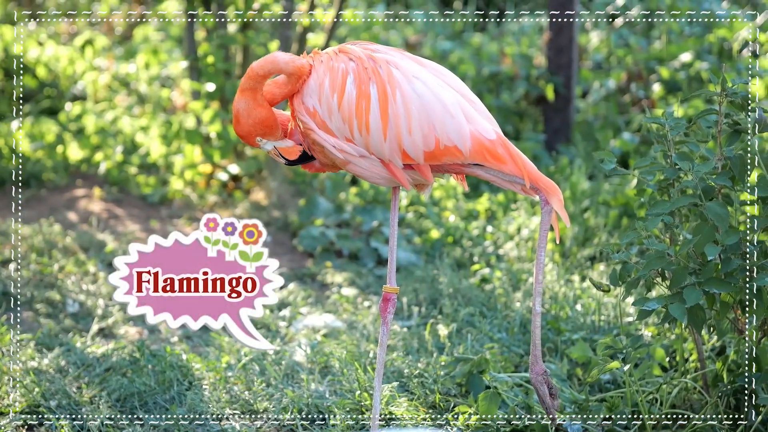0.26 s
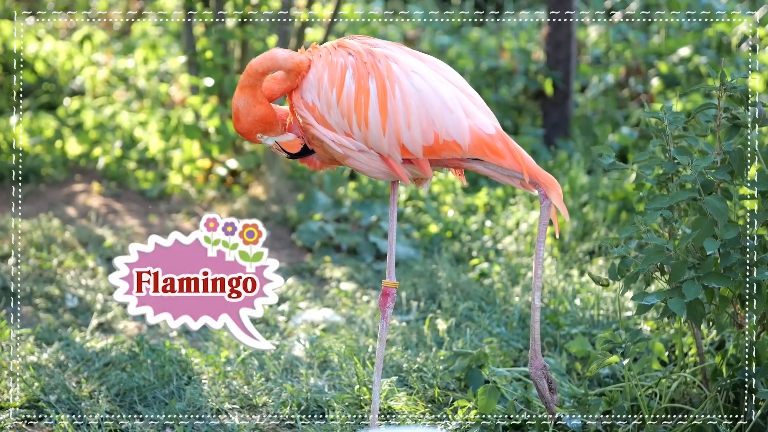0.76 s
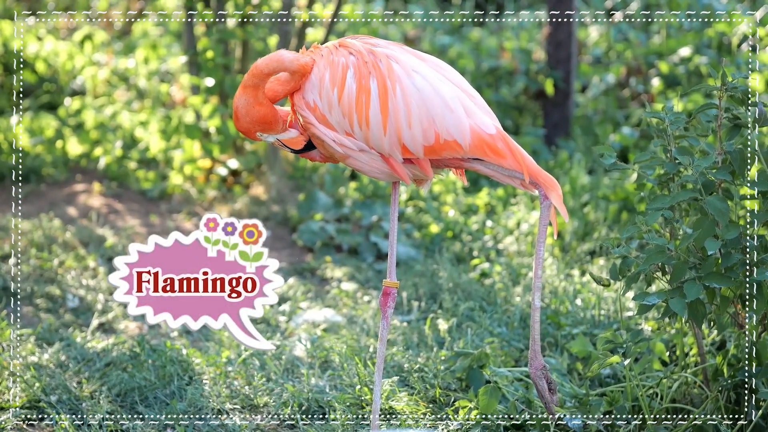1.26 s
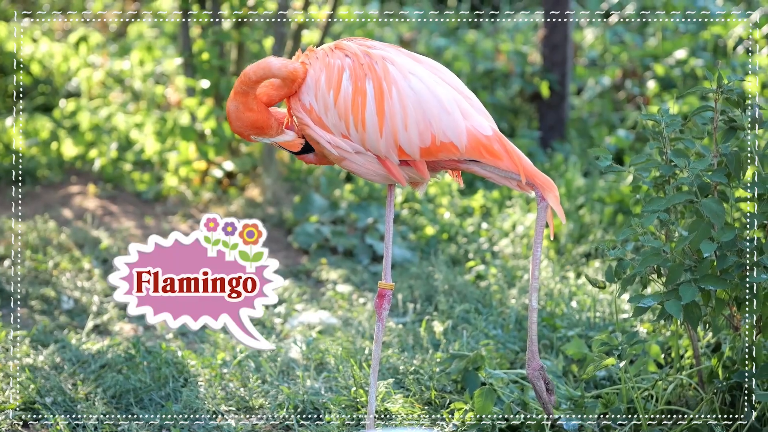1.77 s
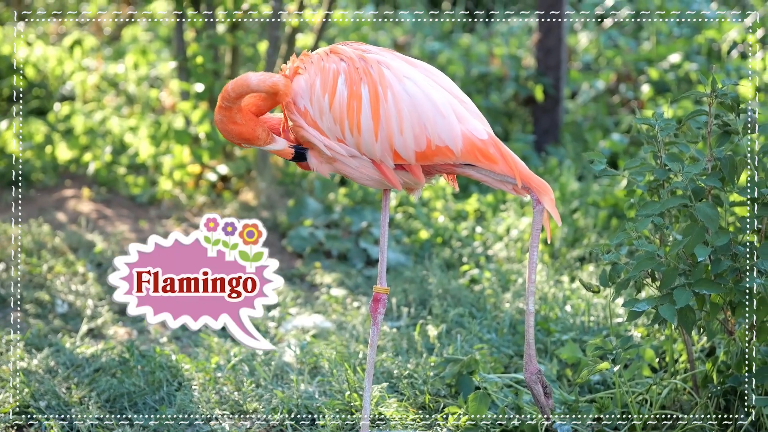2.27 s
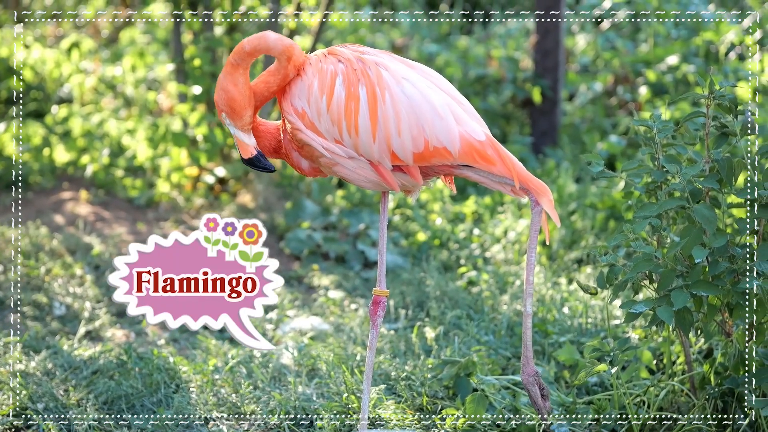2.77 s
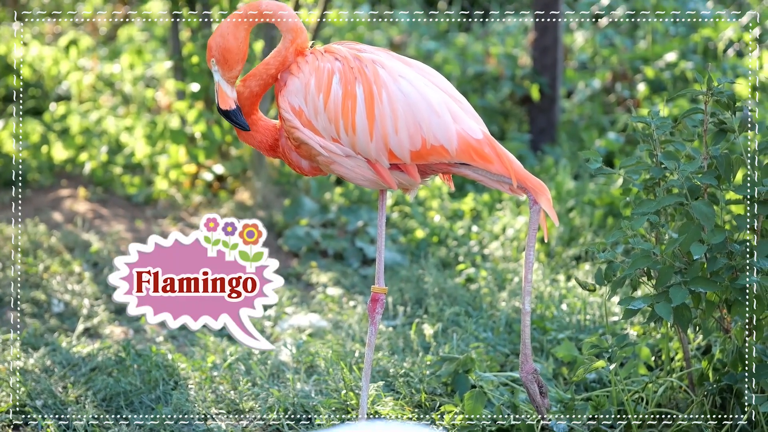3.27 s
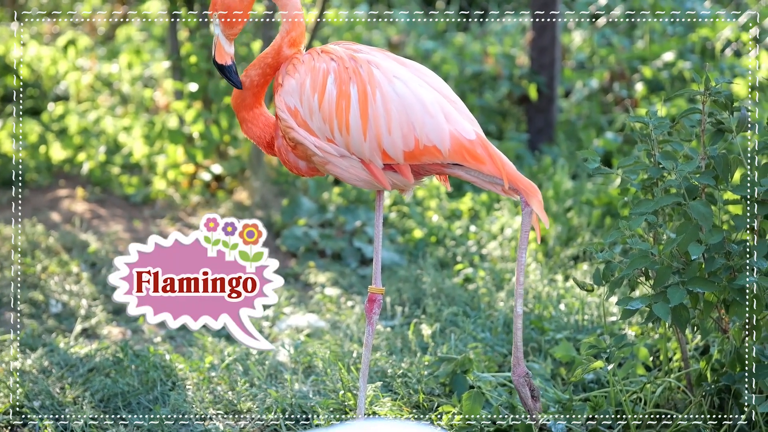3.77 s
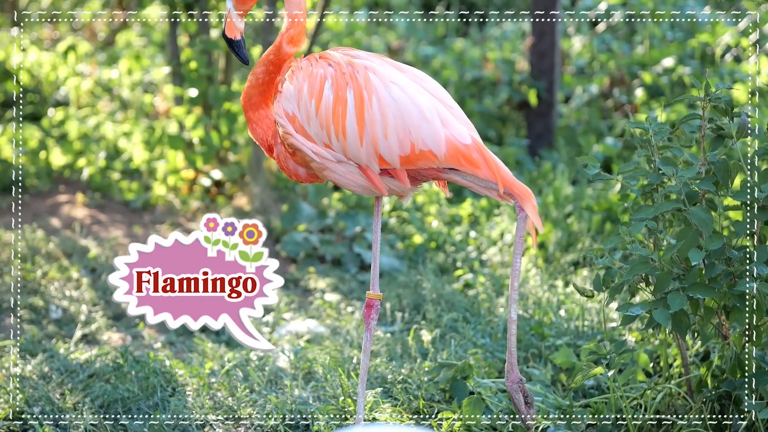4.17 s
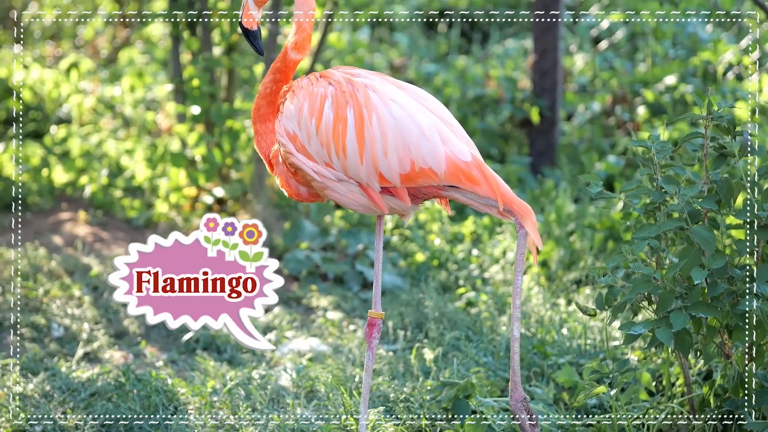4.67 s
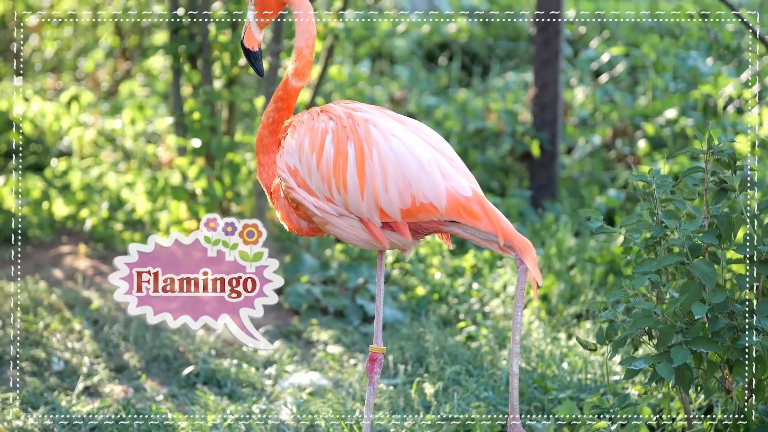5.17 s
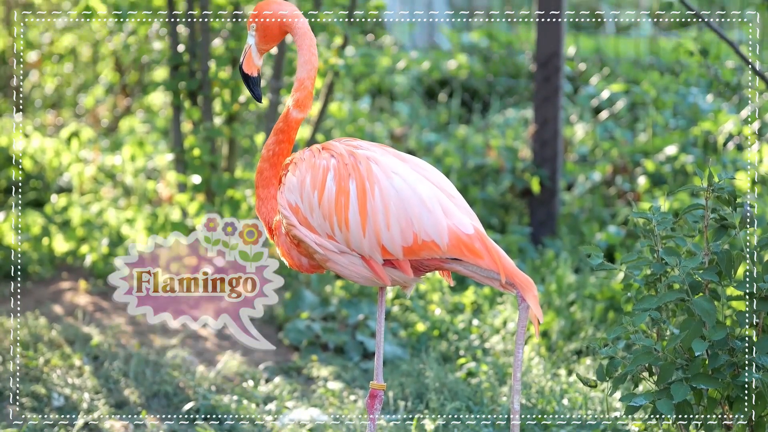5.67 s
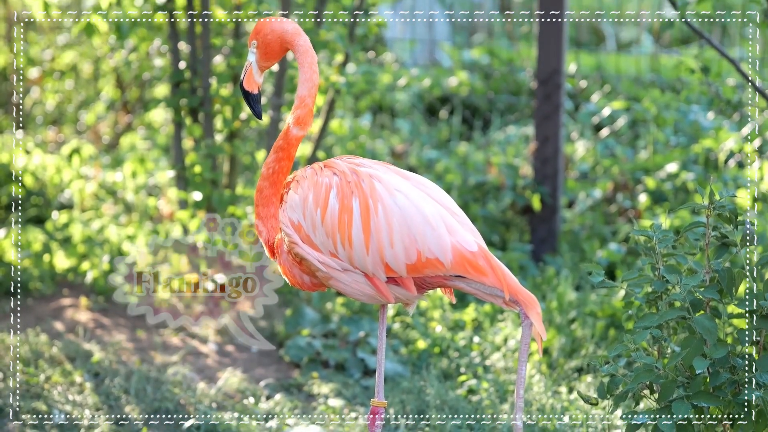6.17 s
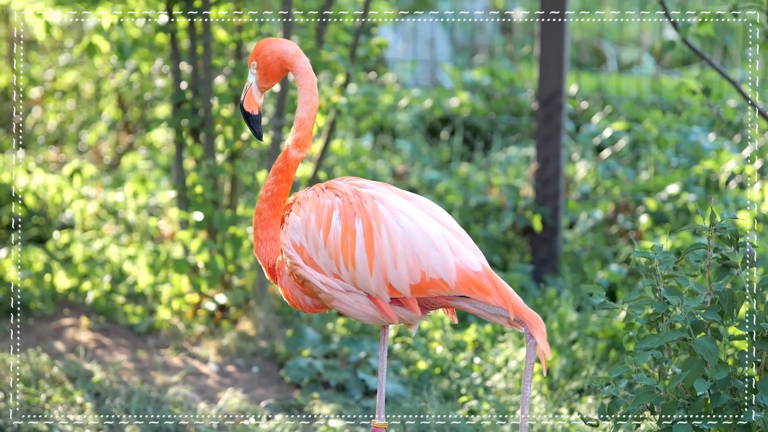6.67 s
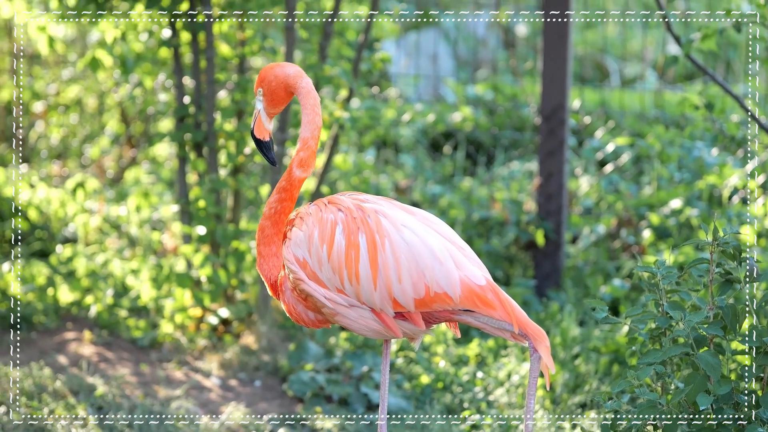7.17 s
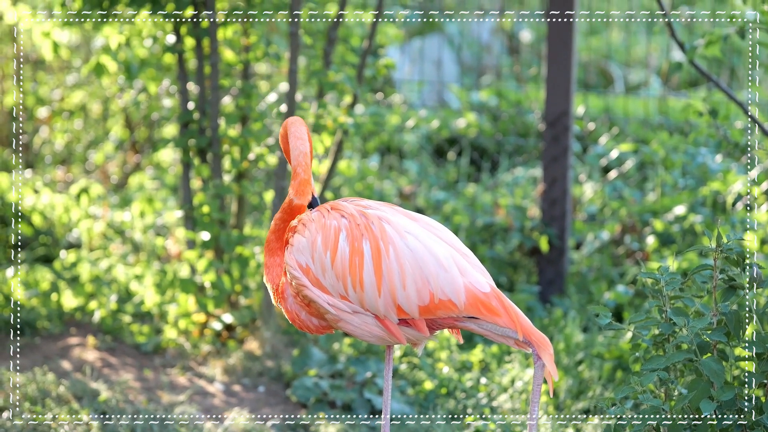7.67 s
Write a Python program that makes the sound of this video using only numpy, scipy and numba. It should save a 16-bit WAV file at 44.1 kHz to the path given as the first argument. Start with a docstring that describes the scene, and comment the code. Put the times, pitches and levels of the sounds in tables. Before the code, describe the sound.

Flamingos honk in hoarse, fluttering clusters outdoors, with trilled cries, short whistles and nasal notes over a steady murmur of distant flock and rumble.

```python
"""Over a steady murmur with rumble, faint tones, ticks and far honks, a hoarse trilled cry is just ending.
Short whistles (gliding partials) lead to two clusters of flamingo honks, a second trilled cry between them.
A honk is a membrane fluttering about 110 times a second, each flap a puff into the windpipe resonances.
From 3.5 s on a thin, a near and a deep voice follow one another amid two nasal notes and louder whistles.
Echoes, a dying tail of noise, trail all the near birds; thin and near honks close the scene."""
import sys
import numpy as np
from scipy import signal
from scipy.io import wavfile
from scipy.ndimage import uniform_filter1d
from numba import njit

SR = 44100
rng = np.random.default_rng(int(sys.argv[2]) if len(sys.argv) > 2 else 0)


def gain_from_decibels(decibels):
    """Convert decibel values to linear amplitude factors."""
    exponent = np.asarray(decibels, float) / 20
    return 10 ** exponent


def file_out(sig):
    """Save sig as 16-bit WAV at sys.argv[1]."""
    # one column per channel
    cols = np.atleast_2d(sig).T
    # limit, then scale
    lim = np.clip(cols, -1, 1)
    pcm = np.round(lim * 32767).astype(np.int16)
    wavfile.write(sys.argv[1], SR, pcm)


N = 349272


def rms_one(x):
    """Normalisation: scale to unit rms."""
    return x / np.sqrt(np.mean(x ** 2) + 1e-20)


def lay_out(rows):
    """Linear interpolation: sample span of a table, a short fade at both ends, and its columns over the span."""
    s, *columns = np.transpose(rows)
    at = np.arange(round(s[0] * SR), min(round(s[-1] * SR), N))
    fade_s = .0015
    fade = np.clip(np.minimum(at - at[0], at[-1] - at) / (fade_s * SR), 0, 1)
    return at, fade, [np.interp(at / SR, s, column) for column in columns]


def at_hz(points, hz):
    """Logarithmic pitch scale: read a spectrum by interpolating on a log-frequency axis."""
    point_hz, value = np.transpose(points)
    return np.interp(np.log(hz), np.log(point_hz), value)


def drift(per_s, size):
    """Random modulation of unit rms: straight lines between random values, per_s of them a second."""
    t = np.arange(size) * per_s / SR
    knots = np.arange(int(t[-1]) + 2)
    return rms_one(np.interp(t, knots, rng.standard_normal(len(knots))))


def panned(x, db):
    """Level-difference stereo: left louder than right by db."""
    return x * gain_from_decibels(np.array([[db / 2], [-db / 2]]))


@njit
def resonate(x, turn, r):
    """Two-pole resonance whose centre (radians a sample) moves."""
    y = np.zeros(len(x))
    for i in range(2, len(x)):
        y[i] = x[i] - x[i - 2] + 2 * r * np.cos(turn[i]) * y[i - 1] - r * r * y[i - 2]
    return y


def pipe(x, hz, width_hz):
    """Cascaded resonance: three equal stages, each width_hz wide, give steep flanks; rms 1."""
    turn = 2 * np.pi * hz / SR * np.ones(len(x))
    r = np.exp(-np.pi * width_hz / SR)
    for _ in range(3):
        x = resonate(x, turn, r)
    return rms_one(x)


def flaps(per_s, jitter, rough, narrow, uneven_db):
    """Flow modulation: each flap gives a sharp slap and turbulence; also how far the membrane stands open."""
    size = len(per_s)
    phase = np.cumsum(per_s * (1 + jitter * drift(110, size))) / SR + 0.1002
    flap_strength = gain_from_decibels(uneven_db * rng.standard_normal(200))
    strength = flap_strength[phase.astype(int) % 200]
    slap = np.diff(np.floor(phase + 0.67), prepend=0)
    opening = (.5 - .5 * np.cos(2 * np.pi * phase)) ** narrow
    turbulence = (opening + .3) * rng.standard_normal(size)
    rough = np.clip(rough, 0, 1)   # share of turbulence in the power
    air = np.sqrt(1 - rough) * rms_one(slap) + np.sqrt(rough) * rms_one(turbulence)
    leak = np.linspace(.45, 1.2, size)   # air between flaps, from the start to the end of a syllable
    return air, strength * (opening + leak)


def tone(hz, partials_db, wobble, flutter_db):
    """Additive synthesis: partials of given rms levels on a slightly unsteady pitch and level."""
    phase = 2 * np.pi * np.cumsum(hz * (1 + wobble * drift(81.4, len(hz)))) / SR
    stack = sum(gain_from_decibels(db) * np.sin((k + 1) * phase) for k, db in enumerate(partials_db))
    return np.sqrt(2) * stack * gain_from_decibels(flutter_db * drift(125.6, len(hz)))


# faint tones of steady pitch: tone_hz [Hz], middle peak level_db [dB]
HUM_TONES = [(1700, -60), (1870, -62)]


def hum():
    """Pure tones in antiphase: opposite in the two channels, their levels drifting slowly."""
    t = np.arange(N) / SR
    tones = sum(gain_from_decibels(db + 3.0 * drift(3.8, N)) * np.sin(2 * np.pi * hz * t) for hz, db in HUM_TONES)
    return tones * [[1], [-1]]


# spectrum of the murmur: band_hz [Hz], relative density_db [dB per Hz]
MURMUR_SPECTRUM = [(15, -46), (25, -25), (42, -17), (70, -4), (110, -.5), (200, -4.5), (290, -4), (368, 3),
                   (433, 0), (1080, 0.1), (2120, -3), (4870, -12), (10400, -25.5), (15500, -38)]
# course of its level before a 1 dB lift: time_s [s], level_db [dB]
MURMUR_COURSE = [(0, -37), (.4, -41), (1.5, -40), (2.8, -39), (3.4, -41), (5.0, -37.5), (6.0, -39),
                 (7.9, -37)]
# likeness of left and right: band_hz [Hz], correlation [0 to 1]
MURMUR_LIKENESS = [(60, 0.52), (240, 0.39), (950, 0.26), (3770, 0.42), (15000, 0.35)]
# stereo balance: band_hz [Hz], left_over_right_db [dB]
MURMUR_BALANCE = [(60, -4), (380, -1.5), (2380, -1.5), (15000, 0.5)]


def murmur(patchy_db):
    """Band-filtered noise: far flock, leaves and rumble in half-octaves, each flickering on its own."""
    out, together = 0, drift(6, N)   # together: a smaller flicker shared by all bands
    edges = 25 * 2 ** np.arange(0, 9.6, .5)
    white = rng.standard_normal((2, 2, N))   # neighbouring bands use different noise
    for k, (low, high) in enumerate(zip(edges, edges[1:])):
        band = signal.butter(2, [low, high], "band", fs=SR, output="sos")
        mid, side = signal.sosfilt(band, white[k % 2])
        hz = np.sqrt(low * high)
        alike = np.clip(at_hz(MURMUR_LIKENESS, hz), 0, 1)
        stereo = np.sqrt(1 + alike) * mid + np.sqrt(1 - alike) * side * [[1], [-1]]
        flicker_db = patchy_db * (0.36 * together + drift(15, N))
        gain = gain_from_decibels(at_hz(MURMUR_SPECTRUM, hz) + flicker_db)
        out = out + gain * panned(stereo, at_hz(MURMUR_BALANCE, hz))
    s, db = np.transpose(MURMUR_COURSE)
    return gain_from_decibels(np.interp(np.arange(N) / SR, s, db) + 1.0) * rms_one(out)


# single ticks: start_s [s], level_db [dB, before a 3 dB cut and the band filter], left_over_right_db [dB]
TICK_TIMES = [(0.2583, -31, 5), (0.4394, -46, -1.0), (1.1344, -33, -0.5), (1.7473, -31, -0.5),
              (3.056, -32, -1.0), (3.4346, -36, -3.5), (5.104, -30, 0.0), (5.25, -33, -1.5),
              (5.3224, -39, -1.0), (5.348, -30, -1.0), (5.933, -29, -0.5), (5.9968, -38, 3),
              (6.2046, -31, 4), (6.8894, -32, 7), (7.314, -29.5, -1.0), (7.354, -34, 2)]


def ticks():
    """Impulsive noise: dry ticks of bills and twigs die away in 3 ms; faint clicks come at random."""
    out, burst = np.zeros((2, N)), np.arange(130)
    decay = np.exp(-burst / 62.0)
    for s, db, pan_db in TICK_TIMES:
        out[:, round(s * SR) + burst] += panned(gain_from_decibels(db - 3) * rng.standard_normal(130) * decay, pan_db)
    faint_per_s = 25
    faint = (rng.random(N) < faint_per_s / SR) * gain_from_decibels(-51 + 4.0 * rng.standard_normal((2, N)))
    band = signal.butter(2, [1800, 13000], "band", fs=SR, output="sos")
    return signal.sosfilt(band, out + faint)


def far_flock(level_db, count=40):
    """Source and filter: far birds honk at random, short, faint and dull, flaps through two resonances."""
    out = np.zeros((2, N))
    for start, length, pitch, loud, side in rng.random((count, 5)):
        size = round((.04 + .1 * length) * SR)
        at = round(start * (N - SR // 5)) + np.arange(size)
        air, _ = flaps(np.full(size, 105.), jitter=.03, rough=1.0, narrow=0.87, uneven_db=1.5)
        hz = 500 + 700 * pitch
        voice = pipe(air, hz, 440) + gain_from_decibels(-8.5) * pipe(air, 2.16 * hz, 450)
        honk = gain_from_decibels(level_db + 6.6 * loud) * np.hanning(size) * voice
        out[:, at] += panned(honk, 8.0 * (side - .5))
    return out


def echoes(x):
    """Diffuse reverberation: trees and walls scatter back a dull dying tail, unrelated left and right."""
    t60_s, level_db, band_hz = .3, -10, [600, 7000]
    t = np.arange(SR // 2) / SR
    onset = np.clip(t / 0.0013, 0, 1)
    tail = rng.standard_normal((2, len(t))) * gain_from_decibels(-60 * t / t60_s) * onset
    tail = signal.sosfilt(signal.butter(1, band_hz, "band", fs=SR, output="sos"), tail)
    return gain_from_decibels(level_db) * signal.fftconvolve(x, rms_one(tail) / np.sqrt(len(t)), axes=1)[:, :N]


# clear whistles and coos: voice, start_s [s], length_s [s], start pitch_hz [Hz],
# first partial's level_db [dB, before swell and flutter], left_over_right_db [dB]
WHISTLE_NOTES = [("reed", .472, .03, 650, -39, -4), ("coo", .51, .065, 660, -42, 19),
                 ("reed", .575, .03, 1040, -45, 0), ("coo", .616, .062, 655, -41.5, 14),
                 ("reed", 1.371, .043, 978, -43, 16), ("reed", 1.511, .051, 975, -41, 9),
                 ("reed", 2.18, .097, 1010, -46, 13), ("coo", 2.751, .05, 680, -38, -2),
                 ("coo", 2.801, .045, 685, -39, 3), ("coo", 3.069, .051, 410, -46, 0),
                 ("squeak", 3.682, .052, 1150, -21, 2), ("flute", 3.885, .11, 1315, -19.5, 4.5),
                 ("flute", 3.992, .09, 1316, -40, -4), ("squeak", 4.344, .044, 1035, -20.5, -2),
                 ("squeak", 4.5, .08, 1060, -24, 4), ("squeak", 5.236, .024, 1780, -38, -6),
                 ("squeak", 5.638, .069, 1095, -16.5, -6), ("drop", 5.699, .062, 997, -24, -3),
                 ("flute", 6.017, .233, 1075, -48.5, -7), ("squeak", 7.147, .04, 1090, -21, 0),
                 ("squeak", 7.702, .032, 1075, -26, -10)]
# their voices: glide [share of the pitch], second_db [dB re first], third_db [dB re first],
# waver [share of the pitch]
WHISTLE_VOICES = {"coo": (.1, -9, -8, .012), "reed": (-.025, -.5, -14, .008),
                  "squeak": (-.028, -16, -24, .006), "flute": (.001, -17, -40, .003),
                  "drop": (-.41, -8, -15, .006)}


def whistles():
    """Harmonic series: three partials swell and fade on a straight glide."""
    out = np.zeros((2, N))
    for voice, start, length, hz, db, pan_db in WHISTLE_NOTES:
        glide, second_db, third_db, waver = WHISTLE_VOICES[voice]
        at = np.arange(round(start * SR), round((start + length) * SR))
        swell = np.abs(np.sin(np.linspace(0, np.pi, len(at)))) ** 0.46
        pitch_hz = hz * np.linspace(1, 1 + glide, len(at))
        note = tone(pitch_hz, [0, second_db, third_db], wobble=waver, flutter_db=0.5)
        out[:, at] += panned(gain_from_decibels(db) * swell * note, pan_db)
    return out


# nasal notes: start_s [s], length_s [s], top_at [share of the length], top pitch_hz [Hz],
# level_db [dB, to which the partial levels add]
TRUMPET_NOTES = [(4.095, .055, .1, 605, -31), (4.185, .125, .6, 628, -27.5)]
# lowest nine partials: level_db [dB re the note's level]
LOW_PARTIALS_DB = [-3, 5, -4.5, -12, -7.5, -15, -19, -20, -22]


def trumpets():
    """Rich harmonic series: twenty partials sound nasal, with a random breathy tremor of the level."""
    out = np.zeros((2, N))
    bend, edge_db = .045, -3.5   # pitch (share) and level lie lower at both ends
    partials_db = list(LOW_PARTIALS_DB) + list(-26 - 1.0 * np.arange(11))   # upper ones fall 1 dB a step
    for start, length, top_at, top_hz, top_db in TRUMPET_NOTES:
        corners = [(start, 1), (start + top_at * length, 0), (start + length, 1)]
        at, fade, (slack,) = lay_out(corners)
        breath = 1 + 0.26 * drift(400, len(at))
        note = tone(top_hz * (1 - bend * slack), partials_db, wobble=0.0025, flutter_db=0.0)
        out[:, at] += panned(fade * gain_from_decibels(top_db + edge_db * slack) * breath * note, -1.5)
    return out


# hoarse trilled cries: start_s [s], level_db [dB, added to the course]
WARBLE_CRIES = [(-.096, -1.5), (1.77, 0.1)]
# course of one cry: age_s [s], centre_hz [Hz], swing_hz [Hz], level_db [dB]
WARBLE_COURSE = [(0, 1200, 190, -40), (.01, 1205, 185, -28), (.1, 1200, 160, -24.5), (.2, 1130, 75, -26),
                 (.27, 1070, 50, -28), (.31, 930, 40, -36), (.37, 900, 20, -42)]


def warbles():
    """Frequency modulation: a quickening trill that breaks at its highest swings, amid breath noise and hiss."""
    out = np.zeros(N)
    trill_per_s, quickening = 12.6, 11.0   # swings a second at the start; gain in swings a second, per s
    break_hz, break_db_per_hz = 1270, .2   # above this pitch the voice breaks off
    for start, level_db in WARBLE_CRIES:
        at, fade, (centre, swing, db) = lay_out(np.add(WARBLE_COURSE, [start, 0, 0, level_db]))
        age = at / SR - start
        hz = centre - swing * np.cos(2 * np.pi * age * (trill_per_s + quickening * age / 2))
        db = db - break_db_per_hz * np.maximum(hz - break_hz, 0)
        breath = rng.standard_normal(len(at))
        hoarse = gain_from_decibels(-7.5) * pipe(breath, hz, 270)
        hiss_hz = 3800 * (1 + 0.07 * drift(30, len(at)))
        hoarse += gain_from_decibels(-15.5 + 2.1 * drift(61.6, len(at))) * pipe(breath, hiss_hz, 1800)
        hoarse += gain_from_decibels(-36) * pipe(breath, 8700, 2700)
        voice = tone(hz, [0, -24, -24], wobble=0.0132, flutter_db=-0.5) + hoarse
        cry = fade * gain_from_decibels(db) * voice
        out[at[at >= 0]] += cry[at >= 0]   # a cry may begin before the scene
    return panned(out, -1.3)


# windpipes: stage widths (low_width_hz, second_width_hz) [Hz] of the two moving resonances,
# left_over_right_db [dB], then fixed resonances: centre_hz [Hz], stage width_hz [Hz],
# level_db [dB, to which a syllable's brightness adds]
NEAR_BIRD = (500, 520), 1.0, [(3200, 950, 1.1), (4500, 950, -5.5), (5300, 400, -16), (6600, 600, -22),
             (8200, 1500, -16), (11000, 2500, -25)]
DEEP_BIRD = (360, 350), -1.7, [(1520, 320, 1.1), (3430, 1030, -13), (4600, 1500, -17), (6400, 450, -41),
             (8300, 4500, -21), (11500, 2700, -40)]
THIN_BIRD = (560, 820), 0.67, [(2255, 760, 2), (4040, 1100, -5), (5000, 1200, -12.5), (6440, 1100, -18.5),
             (7870, 4500, -13.5), (11600, 7500, -28.5)]
# dull resonance under each voice: centre_hz [Hz], stage width_hz [Hz], level_db [dB re the low resonance]
CHEST_RESONANCE = {"near": (750, 280, -12), "deep": (600, 250, -20), "thin": (700, 300, -24)}
# share of the brightness that the second resonance takes on, by bird: share [0 to 1]
SECOND_BRIGHTNESS = {"near": .55, "deep": 0, "thin": 0}
# honk syllables: bird, kind, start_s [s], length_s [s], level_db [dB, to which the envelope adds],
# low resonance low_hz [Hz], brightness_db [dB]
HONK_SYLLABLES = [("near", "opener", .708, .092, -26.5, 1115, -9),
                  ("near", "middle", .826, .15, -25.5, 1130, -11),
                  ("near", "closer", 1.0, .152, -27, 1140, -11),
                  ("near", "opener", 2.292, .086, -26, 1140, -9),
                  ("near", "middle", 2.405, .155, -26.5, 1150, -10),
                  ("near", "closer", 2.575, .17, -26, 1150, -11),
                  ("thin", "yap", 3.504, .096, -33, 955, -20), ("thin", "bray", 3.6, .2, -25, 1045, -14),
                  ("thin", "swell", 3.8, .11, -23.5, 1040, -11), ("thin", "gulp", 4.07, .05, -23, 830, -27),
                  ("near", "opener", 4.142, .098, -25, 1125, -16),
                  ("near", "middle", 4.265, .132, -24, 1065, -16),
                  ("near", "closer", 4.43, .18, -25, 1070, -18),
                  ("deep", "hoot", 4.65, .208, -27, 880, -1.5),
                  ("deep", "blare", 5.503, .225, -24.5, 865, -5.5),
                  ("deep", "echoer", 5.71, .088, -21.5, 845, -6.5),
                  ("near", "opener", 6.336, .092, -23.5, 1085, -16),
                  ("near", "middle", 6.46, .155, -23, 1040, -18),
                  ("near", "closer", 6.625, .17, -22.5, 1100, -18),
                  ("deep", "blare", 6.992, .115, -24.5, 870, -5.5),
                  ("deep", "echoer", 7.09, .112, -22.5, 955, -3),
                  ("thin", "yap", 7.427, .103, -30, 1000, -16), ("thin", "swell", 7.52, .1, -26, 1110, -14),
                  ("near", "shout", 7.608, .132, -21, 1020, -15),
                  ("near", "shout", 7.745, .108, -18, 1000, -14.5)]
# kinds: envelope (attack_s [s], first_db [dB], drift_db while held [dB], release_s [s], last_db [dB]),
# voice (start_rate, end_rate [flaps per s], glide of the low resonance [share],
# second resonance start_hz, end_hz [Hz], second_db [dB, before brightness])
SYLLABLE_KINDS = {"opener": ((.005, -25, -3, .035, -22), (98, 102, .08, 2140, 2450, 3.8)),
                  "middle": ((.04, -12, -.8, .045, -17), (109, 116, -.09, 2470, 2310, 4.1)),
                  "closer": ((.052, -11, 1.1, .04, -24), (105, 114, -.1, 2400, 2240, 3.8)),
                  "shout": ((.03, -9, 0.1, .042, -22), (112, 112, -.06, 2385, 2420, 8.3)),
                  "blare": ((.027, -18, 0.6, .03, -14), (105, 120, .08, 2400, 2420, 3.5)),
                  "hoot": ((.035, -12, -.5, .03, -24), (111, 112, .01, 2540, 2480, 3.0)),
                  "echoer": ((.025, -7, -4, .037, -26), (120, 110, .08, 2420, 2340, 2.2)),
                  "yap": ((.01, -26, -6, .015, -6), (110, 72, -.25, 2830, 3040, -5.5)),
                  "gulp": ((.016, -25, -4, .015, -8), (98, 77, -.34, 2700, 2600, -19.5)),
                  "bray": ((.084, -14, -6, .015, -6), (106, 100, -.18, 2950, 2900, -6)),
                  "swell": ((.09, -8, 0.1, .012, -6), (115, 130, -.22, 2815, 3030, -6.5))}


def honker(name, bird):
    """Source and filter: flaps excite one bird's windpipe, whose ring is damped while the membrane is shut."""
    (low_width, second_width), pan_db, fixed = bird
    chest_hz, chest_width, chest_db = CHEST_RESONANCE[name]
    out = np.zeros(N)
    for owner, kind, start, length, db, low_hz, upper_db in HONK_SYLLABLES:
        if owner != name:
            continue
        envelope, manner = SYLLABLE_KINDS[kind]
        attack, first_db, drift_db, release, last_db = envelope
        rate_0, rate_1, glide, second_0, second_1, second_db = manner
        hold_end = max(length - release, attack)
        corners = [(0, first_db), (attack, -drift_db / 2), (hold_end, drift_db / 2), (length, last_db)]
        # pressure swells evenly between corners
        at, fade, (effort,) = lay_out([(start + s, gain_from_decibels(db + rise_db)) for s, rise_db in corners])
        size = len(at)
        rate = np.linspace(rate_0, rate_1, size)
        air, opening = flaps(rate, jitter=.03, rough=.78, narrow=1.0, uneven_db=.8)
        shake = 1 + 0.028 * drift(110.1, size)   # the throat shakes at about the pace of the flaps
        bright = (effort / effort.max()) ** .5   # harder blowing brings out the treble
        low_course = low_hz * np.linspace(1 - glide / 2, 1 + glide / 2, size)
        second_course = np.linspace(second_0, second_1, size)
        second_gain = gain_from_decibels(second_db + SECOND_BRIGHTNESS[name] * upper_db)
        voice = pipe(air, shake * low_course, low_width)
        voice -= second_gain * bright * pipe(air, shake * second_course, second_width)
        voice -= gain_from_decibels(chest_db) * pipe(air, shake * chest_hz, chest_width)
        for k, (hz, width, level_db) in enumerate(fixed):   # signs alternate
            voice += (-1) ** k * gain_from_decibels(upper_db + level_db) * bright * pipe(air, shake * hz, width)
        power = uniform_filter1d(voice ** 2, 400)   # steady air pressure evens out the flaps
        voice = voice * (np.mean(power) / (power + 1e-9)) ** .5
        out[at] += fade * effort * voice * rms_one(opening)
    return panned(out, pan_db)


def scene():
    """Superposition: near birds with their echoes over the background."""
    background = hum() + murmur(patchy_db=1.84) + ticks() + far_flock(level_db=-50.5)
    cries = whistles() + trumpets() + warbles()
    honks = honker("near", NEAR_BIRD) + honker("deep", DEEP_BIRD) + honker("thin", THIN_BIRD)
    birds = cries + honks
    return background + birds + echoes(birds)


def roll_off(x):
    """The treble ends steeply here."""
    return signal.sosfilt(signal.butter(12, 15840, fs=SR, output="sos"), x)


def record(dry):
    """Soft saturation: the microphone amplifier rounds the highest peaks."""
    top = .9   # ceiling, full scale = 1
    mix = top * np.tanh(dry / top)
    return roll_off(mix)


dry = scene()
out = record(dry)
file_out(out)
```